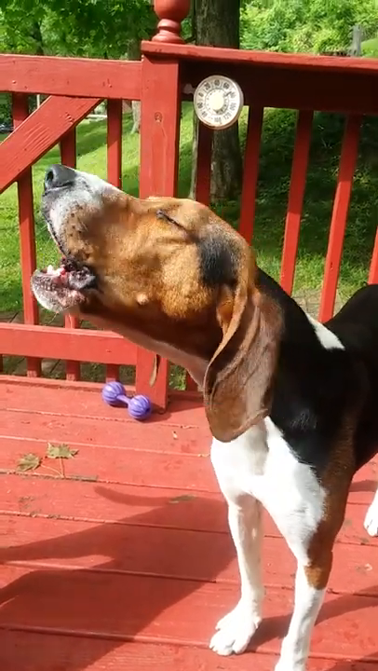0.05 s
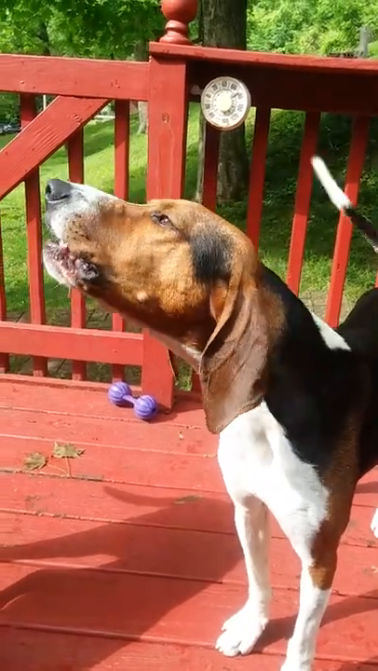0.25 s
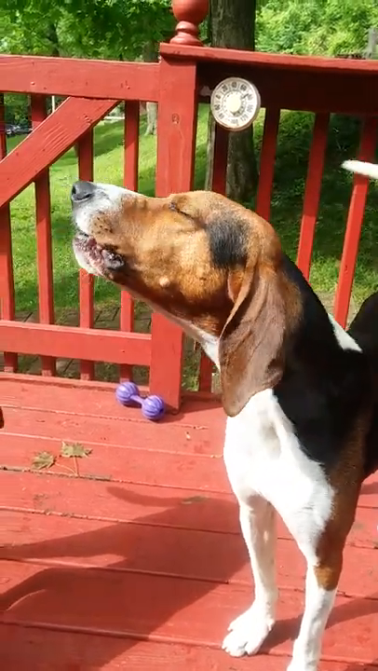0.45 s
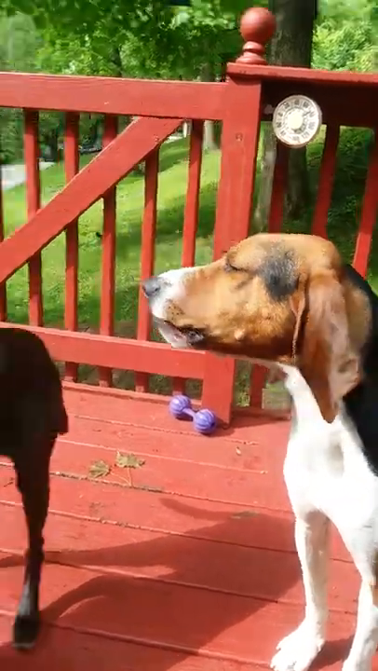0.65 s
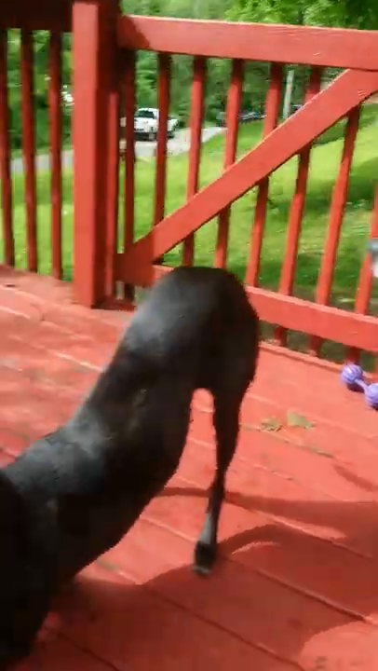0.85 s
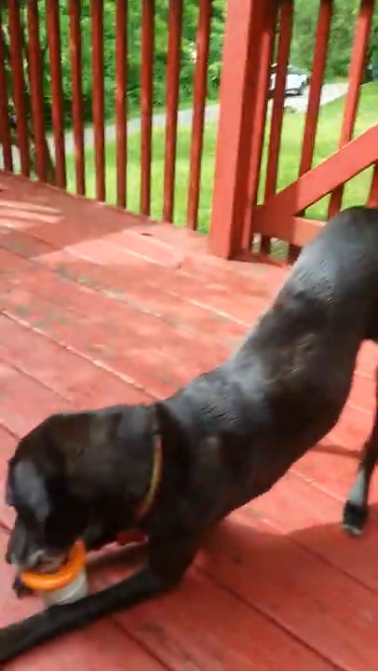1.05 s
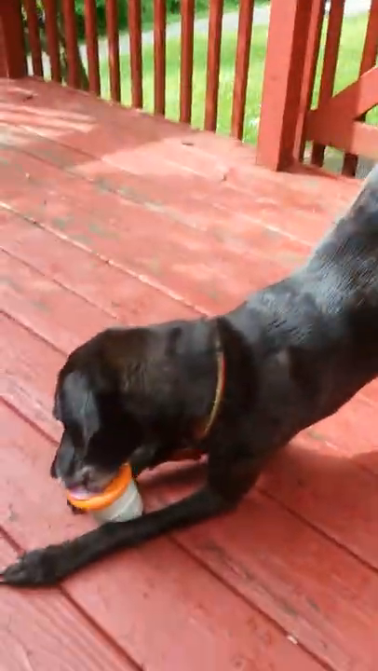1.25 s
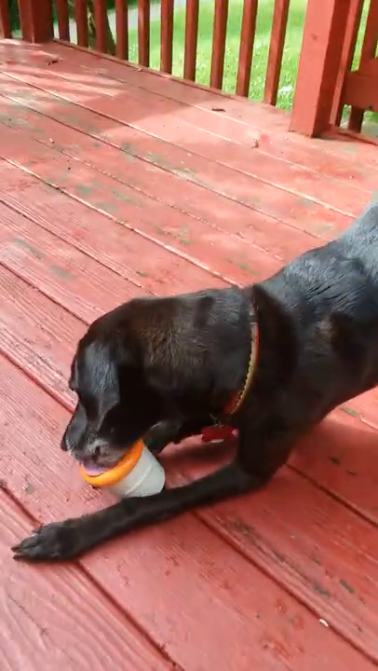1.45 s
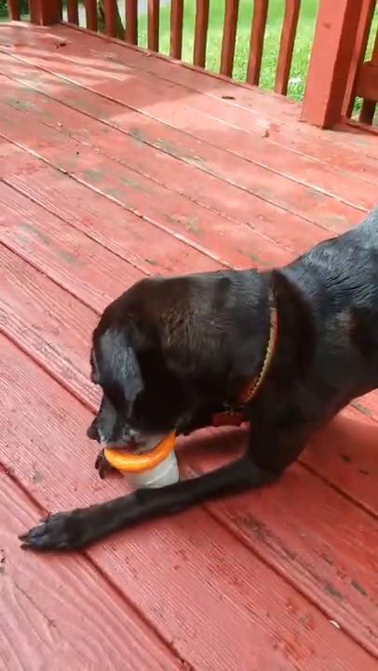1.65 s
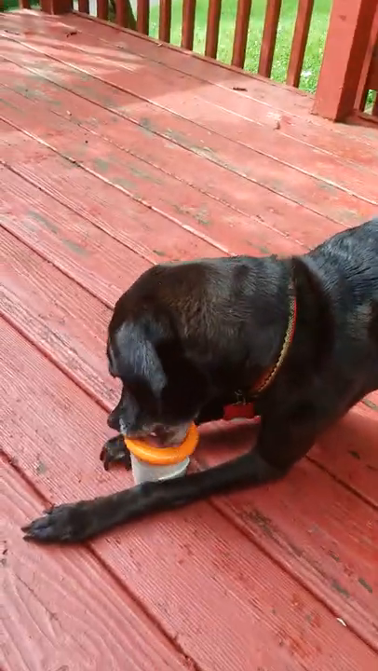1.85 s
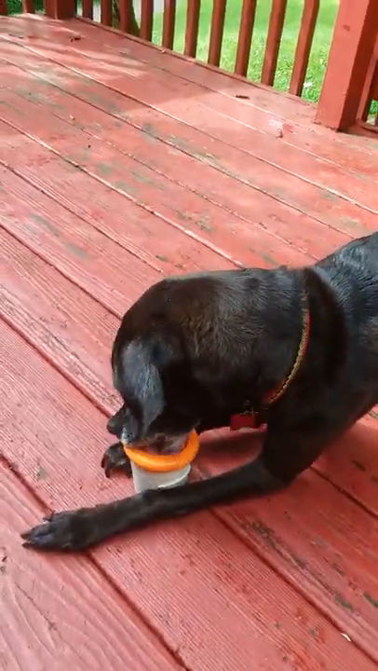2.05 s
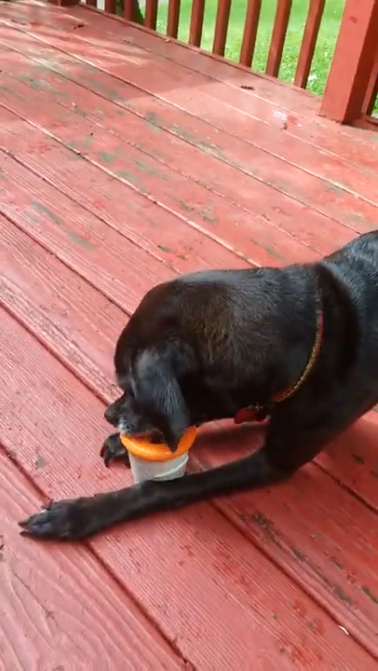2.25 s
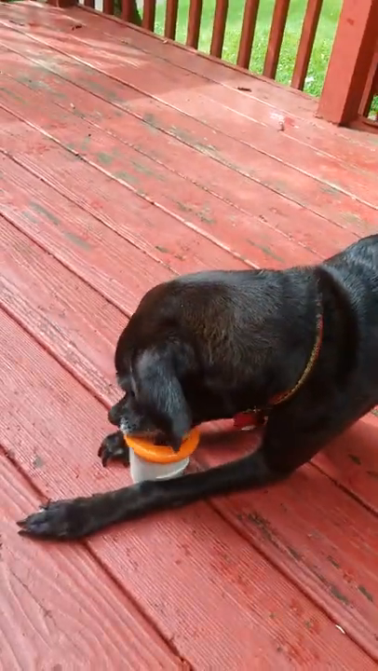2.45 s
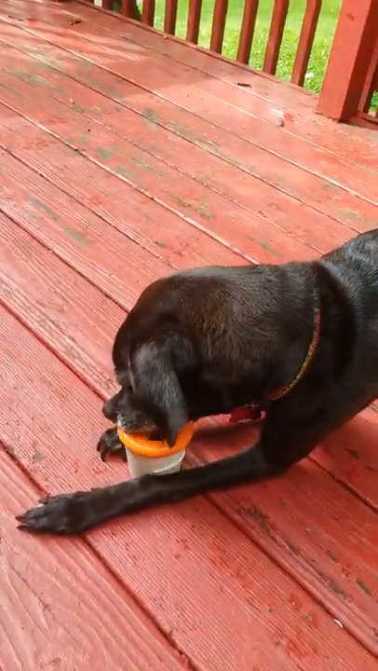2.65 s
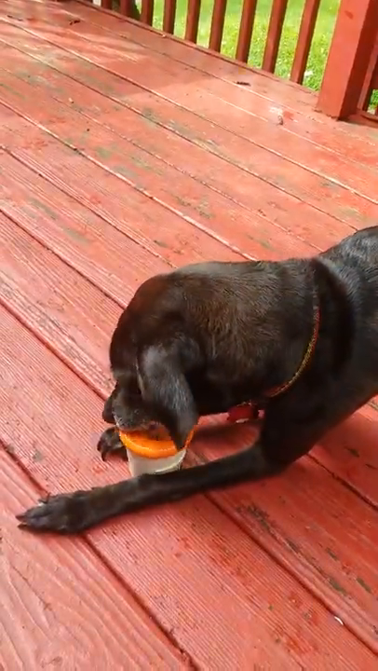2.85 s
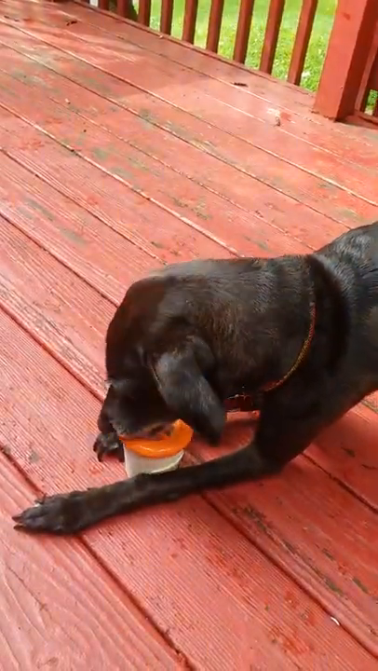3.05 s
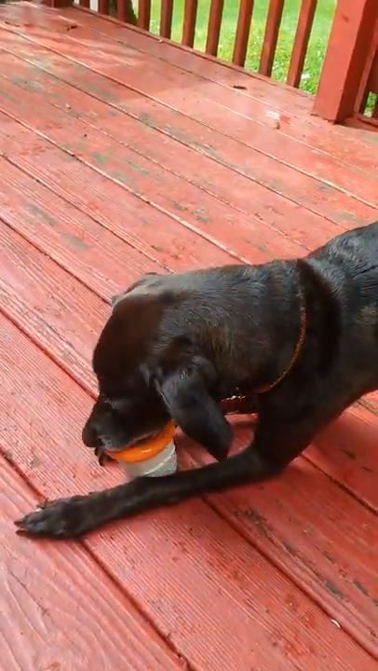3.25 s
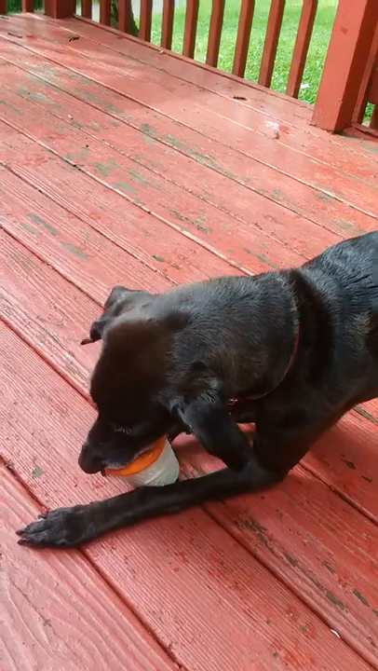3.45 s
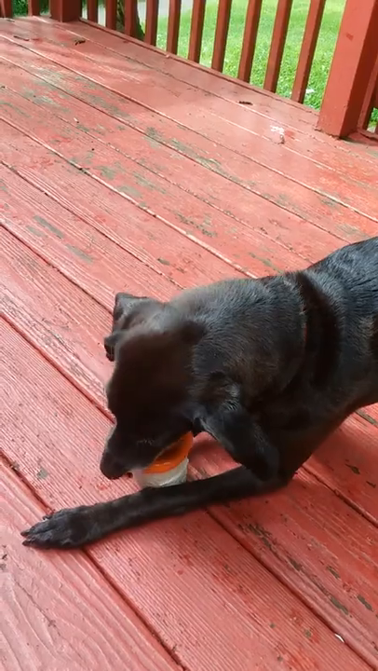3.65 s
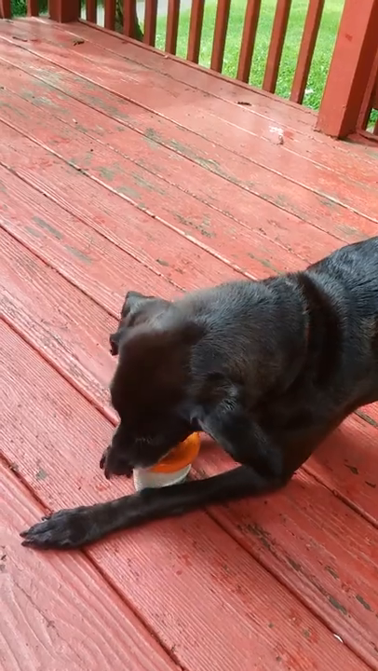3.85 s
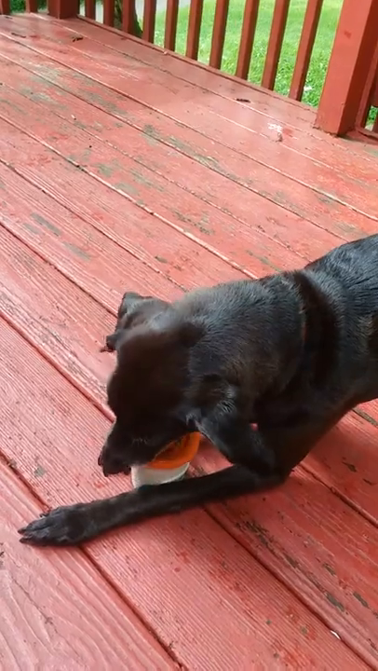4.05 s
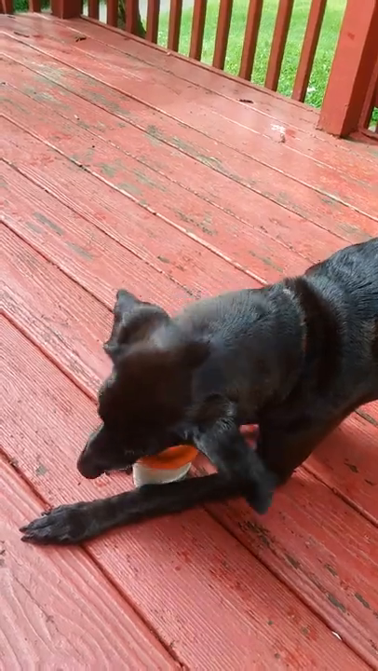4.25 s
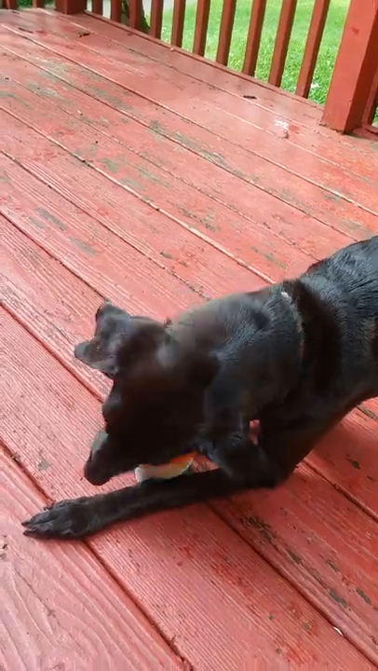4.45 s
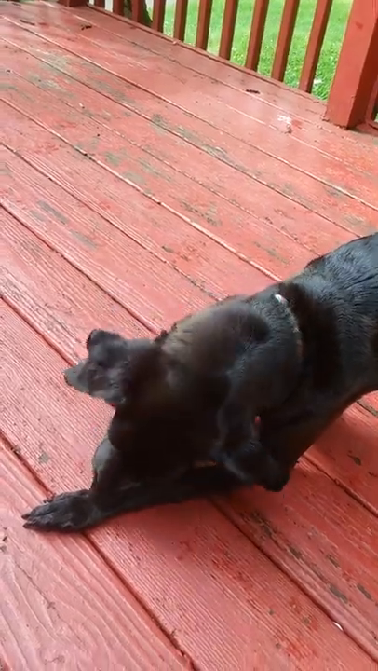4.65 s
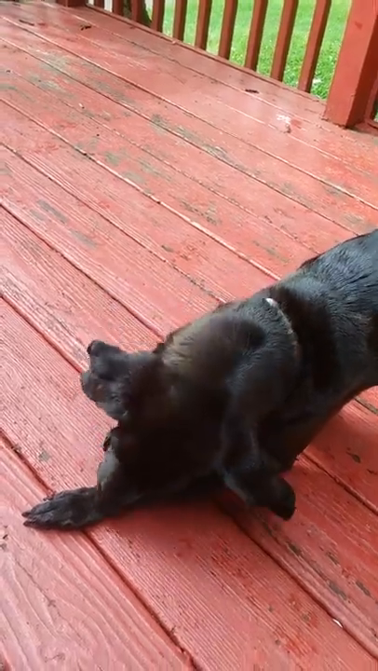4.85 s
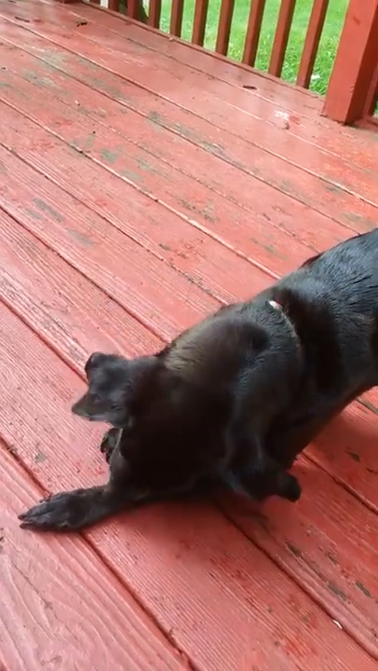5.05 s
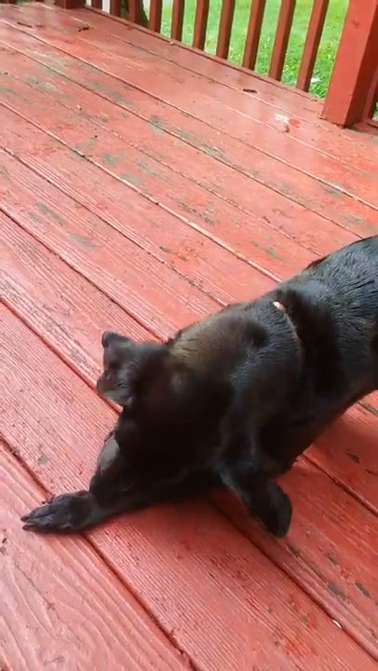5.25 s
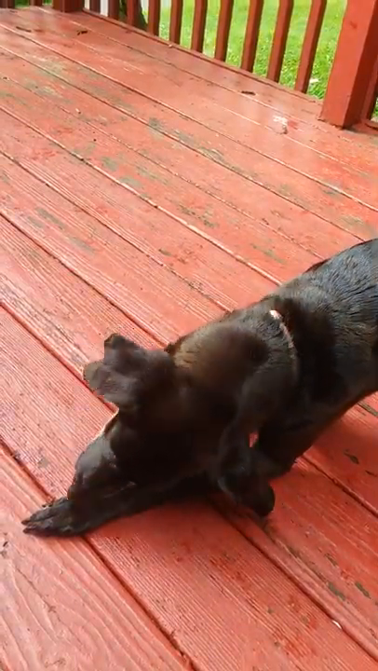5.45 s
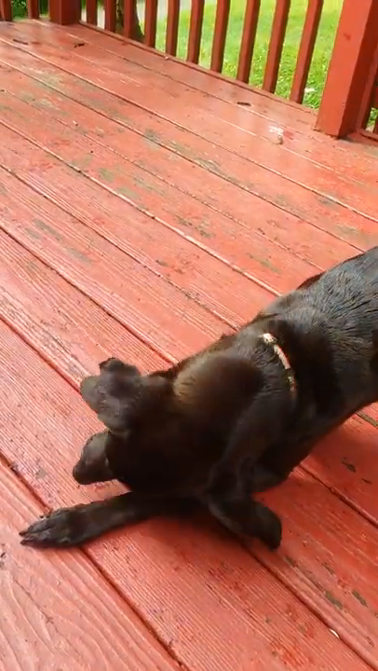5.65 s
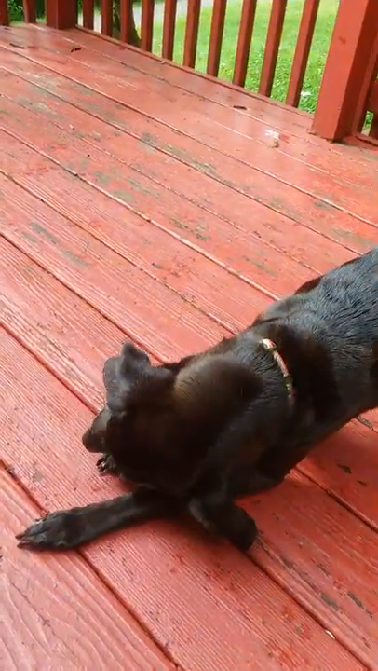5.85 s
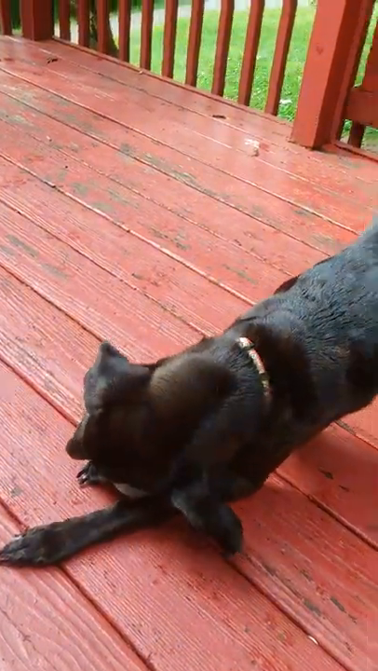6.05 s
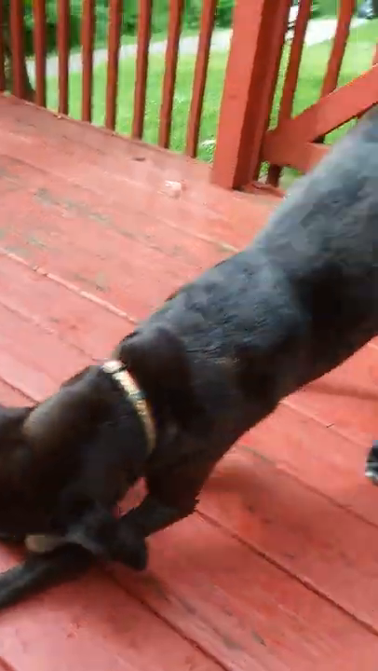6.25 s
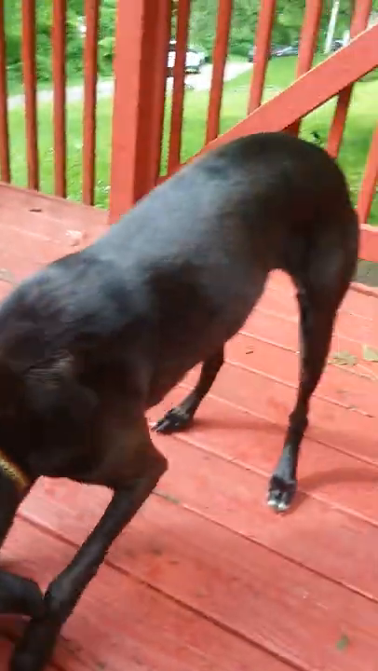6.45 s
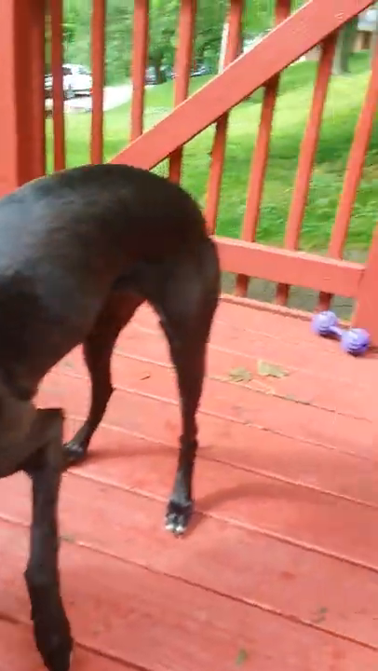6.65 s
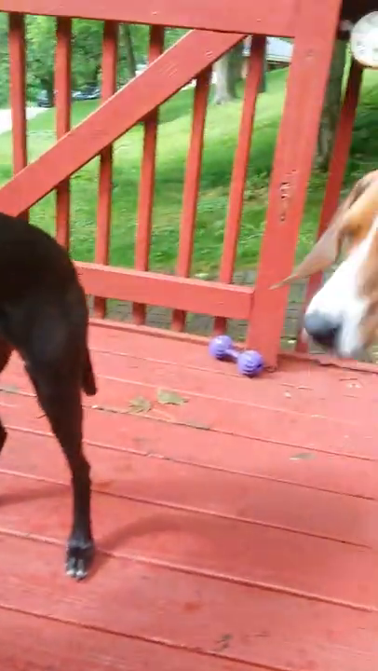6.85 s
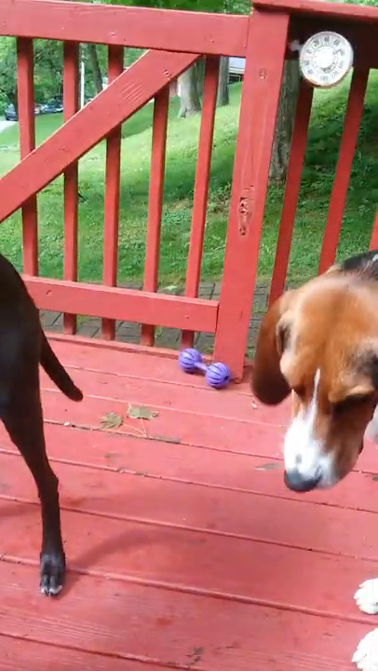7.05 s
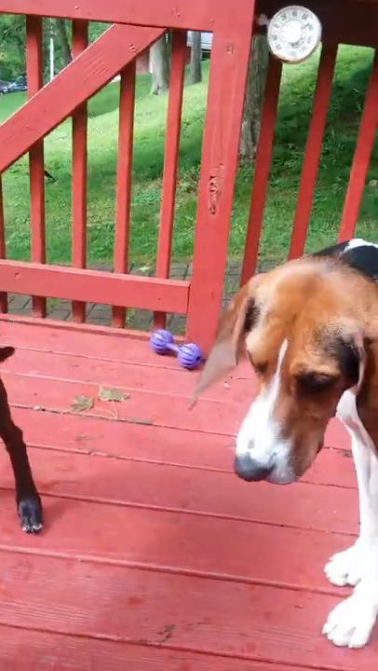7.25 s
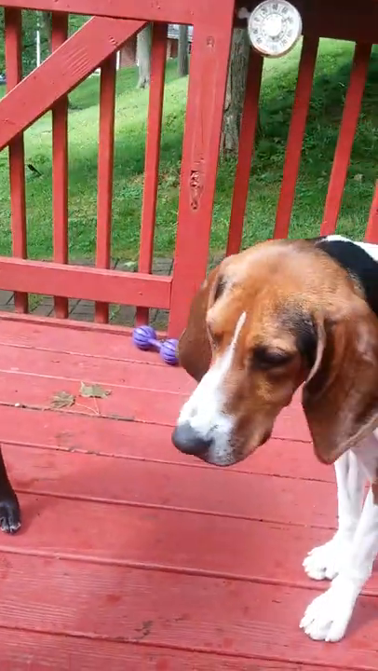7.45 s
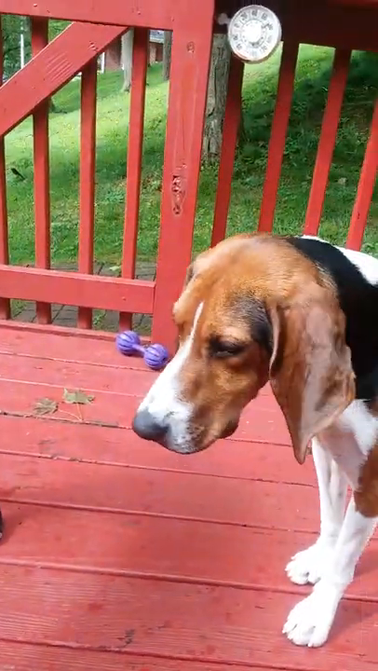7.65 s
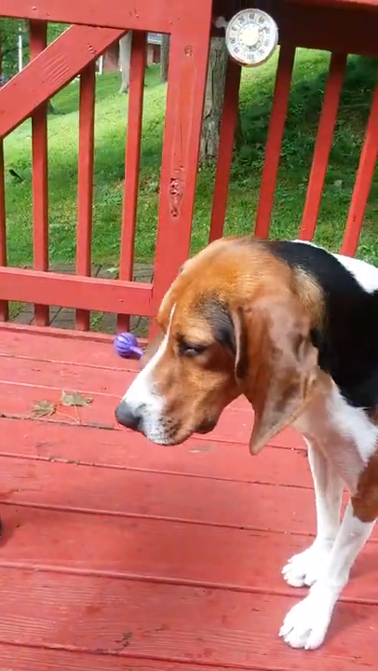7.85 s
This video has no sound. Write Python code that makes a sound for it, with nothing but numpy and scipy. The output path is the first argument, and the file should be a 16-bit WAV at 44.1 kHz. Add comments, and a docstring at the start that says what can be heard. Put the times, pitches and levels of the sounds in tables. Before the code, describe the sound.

On an open wooden deck, a hound's brief bay opens the scene at full volume and drops away. The background swells up: robin-like phrases, repeated rising whistles with dry chips, thin high birds, distant engine, airy hiss. Light claw clicks and a short plastic stutter come mid-way. The hound draws breath and bays powerfully for most of a second; birdsong follows. Close phone microphone with automatic level control.

```python
"""A hound bays at once, and again near 5 s, on a wooden deck beside a phone: partials, fold beats and breath.
Under it lie engine rumble, road wash and airy treble, as shaped noise; birds in the trees are gliding sines.
Claws click, then another dog worries a plastic cup: slips ring its modes. The hound inhales resonant noise
before its second bay. Gain control lifts the quiet between bays."""
import sys
import numpy as np
from scipy import signal
from scipy.io import wavfile
from scipy.ndimage import uniform_filter1d, minimum_filter1d

SR = 44100
rng = np.random.default_rng(int(sys.argv[2]) if len(sys.argv) > 2 else 0)


def materialize(psi):
    """Save the field psi as 16-bit PCM at rate SR to the path in sys.argv[1].

    A 1-D psi becomes a single channel; in a 2-D psi each row is a channel.
    """
    bounded = np.clip(np.atleast_2d(psi).T, -1, 1)
    quanta = np.round(bounded * 32767).astype(np.int16)
    wavfile.write(sys.argv[1], SR, quanta)


N = 348831
EDGE_HZ = 15750  # band limit

# One list a bay: (time [s], pitch [Hz], effort [dB], mouth opening [0-1],
# second fold tone against effort [dB], head turned away [0-1])
BAYS = [
    [(0, 413.5, -21, 0.4, -24.5, 0.1), (.04, 408.5, -21, .45, -14.5, 0.45),
     (.09, 398.4, -22, 0.43, -10.5, 0.53), (.13, 428, -21.5, 0.44, -20, 0.6),
     (.165, 415.4, -25, 0.58, -21, 0.87), (.185, 461, -20.5, 0.13, -37.5, 0),
     (.205, 419.6, -37.5, 0.5, 2, 0.7), (.23, 320, -47.5, 0.18, -11, 0.9), (.265, 226, -48, 0.1, -3, 0.3)],
    [(4.716, 310, -53, 0, 15.5, .11), (4.728, 306.7, -28, 0.52, -0.5, .15),
     (4.74, 320.7, -19.5, 1, -20, 0.38), (4.79, 385, -19, 0.93, -27.5, 0.19),
     (4.85, 412.1, -16.5, 0.76, -26, 0.08), (4.92, 411.4, -12.5, 0.56, -16, 0.12),
     (4.97, 404.8, -16.5, 0.47, -10.5, 0.3), (5.02, 425.5, -13.5, 0.37, -26.5, 0.35),
     (5.052, 461, -5, 0.1, -47, 0.6), (5.14, 440.6, -8.5, 0.13, -45, 0.55),
     (5.18, 450.5, -8, 0.12, -46.5, 0.81), (5.235, 452.3, -8, 0.17, -39.5, .6),
     (5.266, 435.6, -12, 0.27, -27.5, 0.76), (5.278, 407.8, -25, .6, -2, 0.43),
     (5.31, 409.5, -23, 0.76, -7.5, 0.6), (5.33, 404.7, -19, 0.25, -8.5, .3),
     (5.35, 399.2, -31, 0.67, -6, 0.56), (5.385, 363.5, -36.5, 0.13, -4.5, 0.9),
     (5.425, 250.3, -53, 0.7, 9, .75)],
]
# Partials 1-4 against effort: (frequency [Hz], mouth shut [dB], half open [dB], wide open [dB])
JAW = [(320, -1.5, -3, -4.5), (440, 2.74, 2.2, -1.5), (640, -12, 3.5, 3), (820, -25, 4.5, -0.9),
       (1000, -19, -0.5, 7), (1250, -12.5, -3.5, -0.5), (1480, -30.5, -4, 3.5), (1760, -29.5, -7, 2.5)]
# Partials 5-6 against the fourth: (frequency [Hz], level [dB])
THROAT = [(1650, -1.5), (1900, -1), (2100, -13.5), (2500, -20.5), (2900, -37)]
# Treble resonances of the mouth: (frequency [Hz], level [dB])
MOUTH = [(2500, -2), (3000, -4.5), (3800, -10), (4400, -19), (4950, -4.5), (5500, -15.5), (6200, -4.5),
         (6900, -20), (7800, -10.5), (9000, -21), (11500, -19), (13500, -14.5), (16000, -20)]
# Treble against effort: (mouth shut [dB], half open [dB], wide open [dB])
TREBLE_DB = (-51.5, -30, -28)
# Voice breaks, treble flares: (time [s], half length [s], level [dB],
# lift under 4.3 kHz [dB], ring near 5 kHz [dB])
BREAKS = [(0.213, 0.029, -55, 6.5, -14), (4.875, 0.049, -49, 3.5, 12), (5.066, 0.014, -43.5, -14.5, -4),
          (5.349, 0.023, -48, -13, -9.5), (5.422, 0.03, -60, 4, -7)]
# Delay by the phone body between its ports: (frequency [Hz], left lead facing [rad], turned away [rad])
PORTS = [(388, .2, 0.49), (834.4, .1, 2.4), (1390, 0.18, 3.5), (1740, 1.7, 3.1), (2500, 2.1, 2.2)]
SECOND_HZ = 96.4  # mean beat rate of the second fold tone
RING_DB, LIFT_DB = -2, -4.5  # outside breaks: near 5 kHz, under 4.3 kHz
CLEAN = .56  # power share of clean partials in the treble
ROUGH_JITTER = .02  # added relative pitch wander at full roughness
PATCHY_DB = 2.5  # rms unevenness of breath
THIRD_LEAN_DB = -3.5  # third partial, left-right

# Distant sound: (time [s], engine rumble [dB], road wash [dB])
DISTANT = [(0, -54.5, -63), (.6, -55.5, -65), (1.35, -50.5, -64.5), (2.3, -53, -66.5), (3.2, -52.5, -66.5),
           (4.1, -54.5, -68.5), (4.9, -56.5, -65), (5.6, -51, -67.5), (6.2, -54, -66.5), (6.6, -51.5, -65),
           (7, -58, -67), (7.92, -59, -71)]
# Engine rumble spectrum: (frequency [Hz], relative density [dB])
RUMBLE = [(12, -81.5), (20, -40), (65, -18.5), (99, 3), (124, 3.5), (155, 3.5), (198, -9), (257, -11.5),
          (285, -17), (325, -18), (385, -18), (450, -30.5), (580, -71.5), (990, -120)]
# Wavering engine note: (frequency [Hz], width [Hz], level against rumble [dB])
HUM = (122, 21, -10.5)
# Road wash spectrum: (frequency [Hz], relative density [dB])
WASH = [(180, -35), (300, 1.5), (340, -13.5), (442, -7), (517, -11), (575, -11), (872, -9), (1270, -12.5),
        (1430, -14.5), (1580, -17.5), (2050, -23.5), (2690, -29.5), (3050, -26.5), (3960, -50.5),
        (6710, -120)]
# Insects and hiss spectrum: (frequency [Hz], relative density [dB])
AIR = [(2000, -44), (2800, -3.5), (3600, -4.5), (4100, -3.5), (4500, 4), (4900, -0.5), (5300, -7.5),
       (6500, -8.5), (7600, -4.5), (8300, -1), (9000, -12), (11000, -12), (14000, -17), (16000, -14.5)]
AIR_DB = -81.5
# Likeness of noise at the two ports: (frequency [Hz], left-right likeness [0-1])
SAME = [(60, 0.96), (100, 0.99), (180, 0.99), (300, 0.84), (520, 0.79), (890, 0.26), (1520, 0.063),
        (2600, 0.11)]
# Tilt of noise between ports: (frequency [Hz], left-right level [dB])
LEAN = [(400, 0), (900, -2), (1700, -0.5), (2600, 4), (8000, 6)]

# Lower bird song: (time [s], phrase [name], level [dB])
ROBIN = [(.225, "fall", -71.5), (.82, "pair", -66.5), (1.51, "flick", -83.5), (2.17, "rise", -87),
         (2.425, "fall", -66.5), (2.96, "level", -67), (3.645, "warble", -66.5), (4.172, "fall", -63.5),
         (5.425, "warble", -65), (6., "slides", -68), (6.205, "flick", -77.5), (6.735, "warble", -65.5),
         (7.362, "fall", -64.5)]
# Higher bird song: (time [s], phrase [name], level [dB])
WARBLER = [(.52, "thin", -75.5), (1.11, "climb", -83), (2.069, "dip", -82), (2.372, "dip", -82),
           (3.7, "climb", -86), (4.355, "thin", -81.5), (5.45, "drop", -76.5), (6.02, "climb", -83.5)]
# Notes by phrase: (time in phrase [s], length [s], start [Hz], middle [Hz], end [Hz], relative level [dB])
PHRASES = { "fall": [(0, .13, 3780, 3510, 3377, -4.5), (.088, .035, 3380, 2780, 2500, 0.5),
           (.148, .09, 2720, 2535, 2485, -0.5)], "warble": [(0, 0.0422, 2226, 2420, 2500, -1),
           (.04, 0.044, 2500, 2500, 2150, 0), (.105, .05, 3290, 2898, 2500, -1.3),
           (.16, 0.031, 2700, 2460, 2080, -0.5)], "pair": [(0, 0.0324, 3000, 2640, 2374, -2.5),
           (.025, 0.056, 2940, 2945, 2900, -1.5), (.08, .11, 2480, 2500, 2550, -1),
           (.22, .038, 2600, 2634, 2480, -1)], "level": [(0, 0.025, 2150, 2160, 2350, -6),
           (.06, 0.056, 2870, 2784, 2660, .1), (.11, 0.053, 2844, 2904, 2830, 1),
           (.14, .064, 2350, 2450, 2500, -1), (.26, 0.055, 2610, 2710, 2720, .1)],
           "slides": [(0, .087, 3000, 3060, 3250, 0), (.05, .058, 3110, 2500, 2230, 3.5),
           (.14, .09, 3050, 2384, 1950, 1.5)], "rise": [(0.021, .28, 2120, 2480, 3500, 6)],
           "flick": [(0, .11, 3000, 3400, 3980, 0)], "thin": [(0, .1, 7850, 7825, 7700, 0.6),
           (.11, .36, 7690, 7460, 7180, 1.9)], "dip": [(0, .05, 8100, 7100, 6460, 4),
           (.05, .14, 6530, 6850, 6600, -1.5)], "climb": [(0, .2, 5650, 6250, 7040, 1.4),
           (.24, .12, 5600, 5524, 5310, -1.8)], "drop": [(0, 0.36, 5950, 4200, 3750, -0.5)], }
# Nearer bird, one row a repeat: (whistle top [Hz], whistle level [dB], chip level [dB])
SERIES = [(1900, -73, -67.5), (1900, -76, -68), (1900, -69, -67.5), (2030, -75, -70), (2280, -81, -72.5),
          (2350, -76.5, -73), (2300, -77.5, -75)]
SERIES_S, EVERY_S, CHIP_AFTER_S = .445, .284, .115  # first whistle, repeat interval, whistle to chip
WHISTLE_HZ, WHISTLE_BEND = 1570, .68  # start, share of climb made by the middle

# Claws on the boards: (time [s], drive [dB])
TICKS = [(.788, -54), (1.083, -51), (2.521, -56), (2.988, -48), (3.979, -60)]
# Cup catching on the boards: (time [s], drive [dB])
JOLTS = [(3.054, -44), (3.066, -46), (3.083, -51), (3.096, -49)]
# Cup modes: (frequency [Hz], relative level [dB], 60 dB decay [s])
CUP = [(952, 11, 0.029), (1466, 9, 0.018), (1710, 10.5, 0.0094), (2100, 5, 0.015), (3000, -2.5, 0.009),
       (673, -29, .03)]
JOLT_RISE_S, JOLT_FALL_S = .006, .012  # time constants
SLIPS_HZ = 1400  # mean rate of random slips
# Hound inhaling: (start [s], attack [s], hold [s], release [s])
INHALE_S = (4.47, .06, .125, .02)
# Inhale level: (at start [dB], after attack [dB], after hold [dB], after release [dB])
INHALE_DB = (-74, -58.5, -54, -79)
# Nose resonances: (frequency [Hz], width [Hz], relative level [dB])
NOSE = [(633, 140, 37), (1110, 620, 32.5), (1900, 180, -23), (3300, 1300, -21)]


def amp(db):
    """Decibels to amplitude."""
    return 10 ** (np.asarray(db) / 20)


def to_db(gain):
    """Amplitude to decibels."""
    return 20 * np.log10(gain)


def evened(x):
    """Scale to rms 1."""
    return x / np.sqrt(np.mean(x ** 2) + 1e-20)


def read(points, hz, axis=1):
    """One table column interpolated over log frequency."""
    rows = np.transpose(points)
    return np.interp(np.log(hz + 1), np.log(rows[0] + 1), rows[axis])


def curves(rows):
    """Start time and every column at sample rate."""
    s, *columns = np.transpose(rows)
    t = np.arange(s[0], s[-1], 1 / SR)
    return s[0], [np.interp(t, s, column) for column in columns]


def add(mix, s, sound):
    """Mix in a sound at s seconds, cut at the end."""
    part = mix[..., round(s * SR):][..., :sound.shape[-1]]
    part += sound[..., :part.shape[-1]]


def resonate(x, hz, width_hz):
    """One-pole complex resonance, near unit peak gain."""
    r = np.exp(-np.pi * width_hz / SR)
    pole = r * np.exp(2j * np.pi * hz / SR)
    return 2 * signal.lfilter([1 - r], [1, -pole], x).real


def wander(count, size):
    """Smooth random drift of rms 1."""
    once = uniform_filter1d(rng.standard_normal(count), size)
    return evened(uniform_filter1d(once, size))


def breath(x, lo_hz, hi_hz):
    """Noise through one band of the mouth's treble resonances."""
    hz = np.linspace(0, SR / 2, 256)
    gain = amp(read(MOUTH, hz)) * (hz > lo_hz) * (hz < hi_hz)
    taps = signal.firwin2(255, hz, gain, fs=SR)
    return evened(signal.fftconvolve(x, taps[None], "same"))


def bay(rows):
    """Fold vibration gives partials and beats; the mouth shapes them, rough breath and a breaking treble."""
    s, (hz, effort_db, jaw, under_db, turned) = curves(rows)
    count = len(hz)
    t = s + np.arange(count) / SR
    jaw = np.clip(jaw, 0, 1)
    second_db = effort_db + under_db
    shares = np.maximum(1 - abs(2 * jaw - np.arange(3)[:, None]), 0)  # shut, half open, wide open
    low_db = [effort_db + sum(shares[j] * read(JAW, k * hz, axis=j + 1) for j in range(3))
              for k in range(1, 5)]

    steady = amp(effort_db + np.dot(TREBLE_DB, shares))
    flares = [(amp(db) * np.exp(-((t - at) / half_s) ** 2), lift, ring)
              for at, half_s, db, lift, ring in BREAKS]
    top_db = to_db(steady + sum(gain for gain, lift, ring in flares))
    ring_db = to_db(steady * amp(RING_DB) + sum(gain * amp(ring) for gain, lift, ring in flares)) - top_db
    lift_db = to_db(steady * amp(LIFT_DB) + sum(gain * amp(lift) for gain, lift, ring in flares)) - top_db

    jitter = 0.0032 + ROUGH_JITTER * np.minimum(amp(under_db), 1)
    turns = np.cumsum(hz * (1 + jitter * wander(count, size=150))) / SR
    beat_hz = SECOND_HZ * (1 + .08 * wander(count, size=600))
    beat = np.exp(2j * np.pi * np.cumsum(beat_hz) / SR)
    depth = np.minimum(amp(second_db - low_db[0]), .8)
    side, out = np.array([[.5], [-.5]]), 0  # left, right
    for k in range(1, 36):
        f = k * hz
        if k < 5:
            db = low_db[k - 1] + side * THIRD_LEAN_DB * (k == 3)
        elif k < 7:
            db = low_db[3] + read(THROAT, f)
        else:
            db = top_db + read(MOUTH, f) + lift_db * (f < 4300) + 5.5 * side
            db += 10 * np.log10(CLEAN + 1e-3) - 5 * (f > 8500)
            db += ring_db * np.exp(-((f - 4950) / 350) ** 2)
        lead = (1 - turned) * read(PORTS, f) + turned * read(PORTS, f, axis=2)
        # Sum tones are strongest on the fundamental; upper partials also get weak difference tones.
        if k == 1:
            sides = 1 + depth * (beat + 0.39 * beat ** 2)
        else:
            sides = 1 + 0.43 * depth * (beat + 0.32 * beat ** 2 + .5 / beat + 0.27 / beat ** 2)
        shimmer = amp(min(.4 * (k - 1), 5) * wander(count, size=350))
        lag = 1.05 * (k - 1)  # throat phase lag, radians
        drift = .7 * (k > 6) * np.array([wander(count, size=400), wander(count, size=400)])  # radians
        tone = np.exp(1j * (2 * np.pi * k * turns - lag + side * lead + drift)) * sides
        out = out + np.sqrt(2) * amp(db) * shimmer * (f < EDGE_HZ) * tone.real

    # Breath pulses once a pitch cycle.
    puffs = (0.33 + np.exp(-(turns % 1) / 0.96)) * rng.standard_normal((2, count))
    rough = resonate(resonate(resonate(puffs, 800, 700), 1000, 1500), 1500, 1800)
    out += amp(second_db - 3.5) * evened(rough)
    bands = [breath(puffs, lo, hi) * amp(db + PATCHY_DB * wander(count, size=500))
             for lo, hi, db in [(2300, 3000, 0.0), (3600, 5600, -5.5), (5600, 7000, -5), (6974, EDGE_HZ, -5.5)]]
    treble = amp(lift_db) * bands[0] + amp(ring_db) * bands[1] + sum(bands[2:])
    out += np.sqrt(1 - CLEAN) * amp(top_db + 5.5 * side) * treble
    # 300-sample fade in, none for a bay at 0 s; 1200-sample fade out
    fade_in = np.arange(count) + 300 * (s == 0)
    fade_out = np.arange(count)[::-1] / 4.0
    return s, out * np.minimum(np.minimum(fade_out, fade_in) / 300, 1)


def echoes(x, gap_s, t60_s):
    """Sparse decaying reflections of random sign, different in each port, about unit energy."""
    taps = np.zeros((2, SR))
    at = np.arange(0, SR - 20, 20) + rng.integers(0, 20, (2, (SR - 1) // 20))
    np.put_along_axis(taps, at, rng.choice([-1., 1.], at.shape), 1)
    t = np.arange(SR) / SR
    taps *= amp(-60 * t / t60_s) * (t > gap_s)
    return signal.fftconvolve(x, taps / np.linalg.norm(taps[0]), axes=1)[:, :N]


def yard(hound):
    """Rails reflect the bays early; far trees return the middle pitches."""
    rails = amp(-17) * echoes(hound, .006, .15)
    middle = resonate(resonate(hound, 900, 800), 1000, 1200)
    return rails + amp(-32.5) * echoes(middle, 0.078, 1.1)


def noise(spectrum, patchy_db):
    """Two-channel noise, patchy over time and frequency, most alike in the bass."""
    hz = np.fft.rfftfreq(2048, 1 / SR)
    a, b, c, d, patches = rng.standard_normal((N // 512 + 5, 1025, 5)).T
    patches = uniform_filter1d(patches, size=12, axis=0)
    patches = evened(uniform_filter1d(patches, size=8, axis=1))
    same = np.clip(read(SAME, hz), -1, 1)[:, None]
    lean = amp(read(LEAN, hz) / 2)[:, None]
    shared, other = a + 1j * b, c + 1j * d
    z = np.array([shared * lean, (same * shared + np.sqrt(1 - same ** 2) * other) / lean])
    z *= amp(read(spectrum, hz)[:, None] + patchy_db * patches)
    return evened(signal.istft(z, nperseg=2048, noverlap=1536)[1][:, :N])


def distance():
    """Engine rumble with a narrow-noise hum, road wash, and steady insects and hiss."""
    rumble_db, wash_db = (c[:N] for c in curves(DISTANT)[1])
    hz, width_hz, hum_db = HUM
    hum = resonate(resonate(rng.standard_normal(N), hz, width_hz), hz, width_hz)
    engine = amp(rumble_db) * (noise(RUMBLE, 1.0) + amp(hum_db) * evened(hum))
    road = amp(wash_db) * noise(WASH, 1.2)
    return engine + road + amp(AIR_DB) * noise(AIR, 1.3)


def notes(song):
    """Every note of a list of phrases."""
    return [(s + at, *shape, db + note_db)
            for s, name, db in song for at, *shape, note_db in PHRASES[name]]


def series():
    """Notes of a repeated rising whistle and falling chip."""
    out = []
    for k, (top_hz, whistle_db, chip_db) in enumerate(SERIES):
        s = SERIES_S + k * EVERY_S
        middle_hz = WHISTLE_HZ + WHISTLE_BEND * (top_hz - WHISTLE_HZ)
        out += [(s, .095, WHISTLE_HZ, middle_hz, top_hz, whistle_db),
                (s + CHIP_AFTER_S, .025, 3550, 3400, 3180, chip_db)]
    return out


def sing(song_notes):
    """Near sines that glide through three pitches, unsteady in pitch and level."""
    out = np.zeros(N)
    for s, length_s, *hz, db in song_notes:
        u = np.linspace(0, 1, round(length_s * SR))
        glide = np.polyval(np.polyfit([0, .5, 1], hz, 2), u)
        glide *= 1 + .004 * wander(len(u), size=120)
        level = np.sqrt(2) * amp(db + 3.7 * wander(len(u), size=150))
        tone = np.sin(2 * np.pi * np.cumsum(glide) / SR)
        add(out, s, level * tone * signal.windows.tukey(len(u), .4))
    return out


def birds():
    """Far in the trees echoes rival the notes; the whistles and chips are nearer and drier."""
    robin, near, warbler = sing(notes(ROBIN))[None], sing(series())[None], sing(notes(WARBLER))[None]
    wet = amp(0.5) * echoes(robin, 0.0074, .8) + amp(-0.5) * echoes(robin, 0.041, 1.0)
    wet += amp(3.0) * echoes(warbler, .004, 1.0)
    direct = amp(-3) * robin + amp(-3) * near + amp(-8) * warbler
    return (direct + wet + amp(-2) * echoes(near, .004, .35)) * amp([[2.5], [-2.5]])


def claws():
    """Each claw is a click and a decaying noise rattle through two broad resonances."""
    out, t = np.zeros((2, N)), np.arange(5000) / SR
    for s, db in TICKS:
        snap = (t == 0) + .35 * amp(-60 * t / .012) * rng.standard_normal(len(t))
        snap = resonate(resonate(snap, 1200, 4000), 1500, 9000)
        add(out, s, amp(db) * snap * amp([[2.5], [-2.5]]))
    return out


def cup():
    """The cup judders over the boards: random slips excite its damped modes."""
    out, t = np.zeros((2, N)), np.arange(5000) / SR
    ring = sum(amp(db - 60 * t / t60_s) * np.sin(2 * np.pi * hz * t) for hz, db, t60_s in CUP)
    soft = ring * np.minimum(t / 0.00071, 1)  # plastic gives: a rounded start
    s = JOLTS[0][0] - .03
    now = s + t[:, None] - [at for at, db in JOLTS]
    pulses = np.exp(np.where(now < 0, now / JOLT_RISE_S, -now / JOLT_FALL_S))
    push = pulses @ amp([db for at, db in JOLTS])
    hits = rng.random(len(push)) < SLIPS_HZ / SR
    slips = rng.standard_normal((2, len(push))) * hits * push * np.sqrt(SR / SLIPS_HZ)
    add(out, s, signal.fftconvolve(slips, soft[None] / np.linalg.norm(soft), axes=1))
    return out


def inhale():
    """The hound draws air: partly shared noise through nose resonances."""
    out = np.zeros((2, N))
    s, (db,) = curves(list(zip(np.cumsum(INHALE_S), INHALE_DB)))
    air = rng.standard_normal(len(db)) + 0.69 * rng.standard_normal((2, len(db)))
    nose = sum(amp(gain_db) * resonate(resonate(air, hz, width_hz), hz, 2 * width_hz) / np.sqrt(width_hz)
               for hz, width_hz, gain_db in NOSE)
    add(out, s, amp(db) * evened(nose))
    return out


def scene():
    """Hound, its reflections, distance, birds and deck sounds summed."""
    hound = np.zeros((2, N))
    for rows in BAYS:
        add(hound, *bay(rows))
    return hound + yard(hound) + distance() + birds() + claws() + cup() + inhale()


def record(dry):
    """Gain control drops fast on loud sound, holds, then lifts the quiet; peak limiter, band limit."""
    power_db = 10 * np.log10(abs(uniform_filter1d((dry ** 2).mean(0), 880)) + 1e-12)
    hold = round(.85 * SR)
    held_db = -minimum_filter1d(-power_db, hold, origin=(hold - 1) // 2, mode="nearest")
    fall_db = np.arange(N) * 42.0 / SR  # detector recovery, 42 dB/s
    held_db = np.maximum(np.maximum.accumulate(held_db + fall_db) - fall_db, -36)
    # Half the level difference from -8 dB is taken out.
    lifted = dry * amp(-.5 * (uniform_filter1d(held_db, 300) + 8.0))
    peak = -minimum_filter1d(-abs(lifted).max(0), size=600)
    lifted = lifted / uniform_filter1d(np.maximum(peak / .95, 1), size=300)
    low_pass = signal.firwin(511, EDGE_HZ, window=("kaiser", 9), fs=SR)
    return signal.oaconvolve(lifted, low_pass[None], "same")


dry = scene()
out = record(dry)
materialize(out)
```